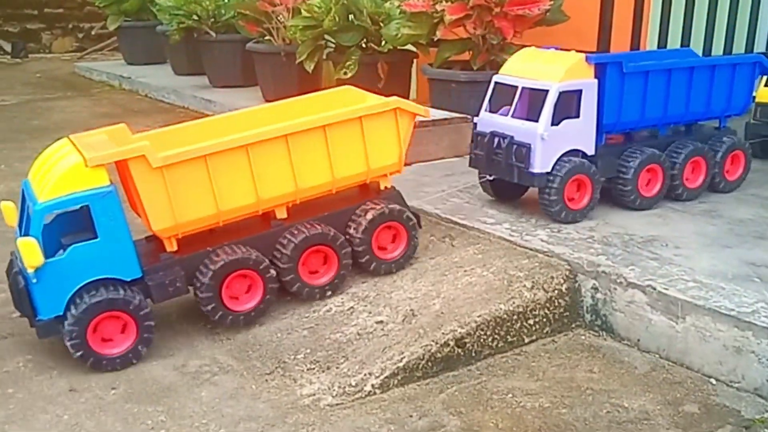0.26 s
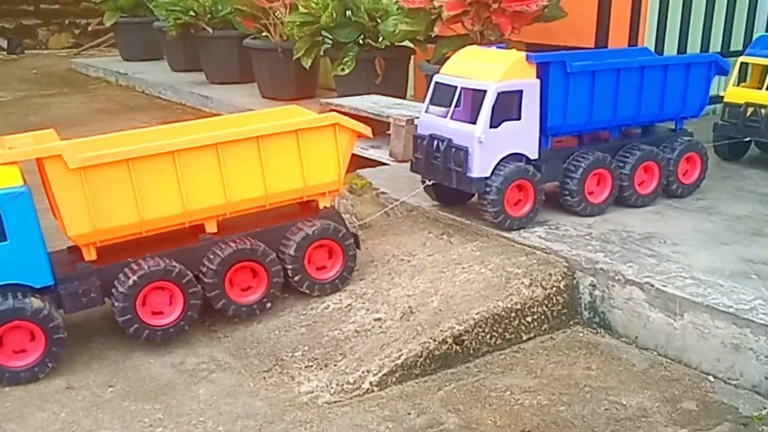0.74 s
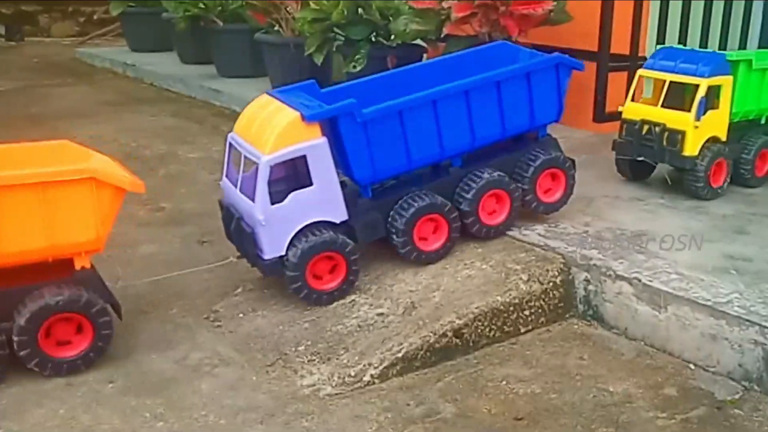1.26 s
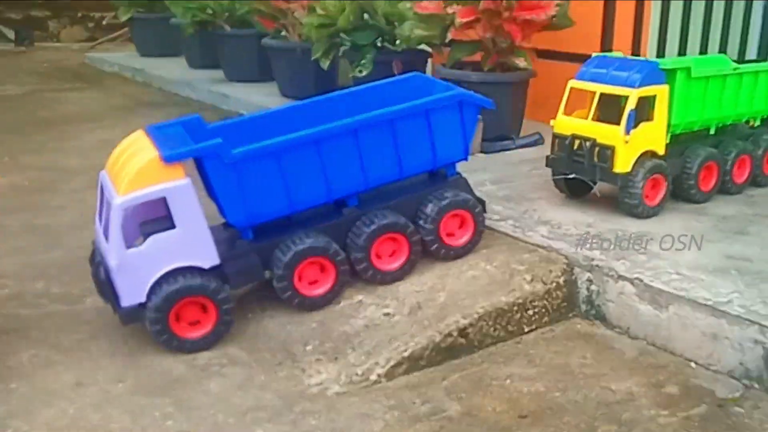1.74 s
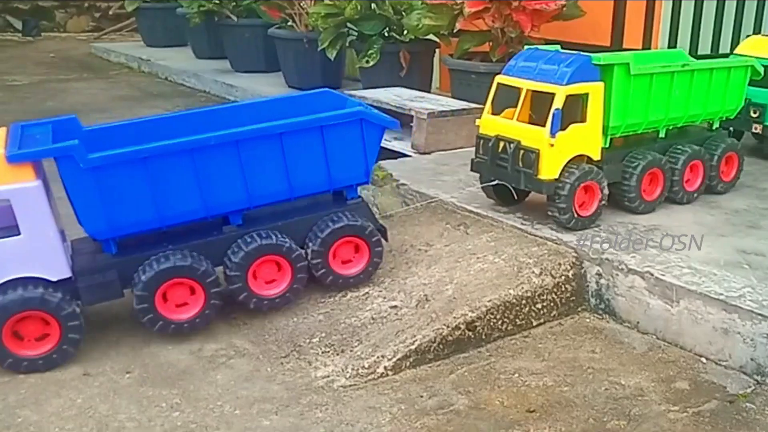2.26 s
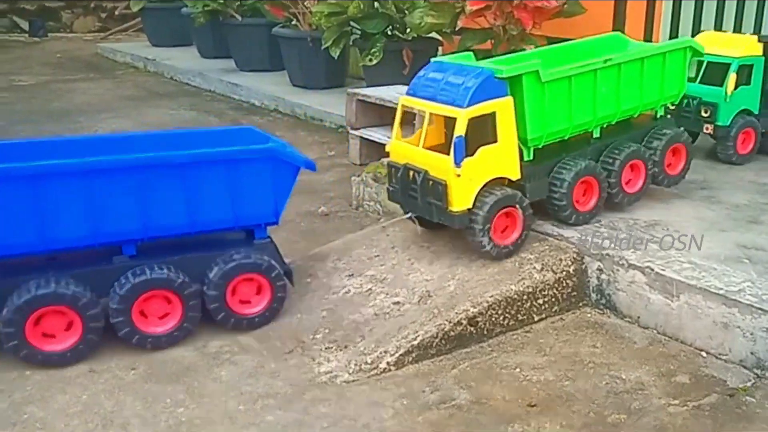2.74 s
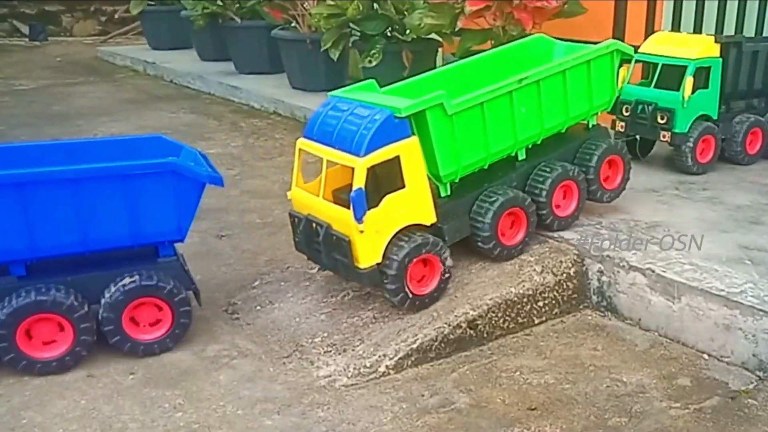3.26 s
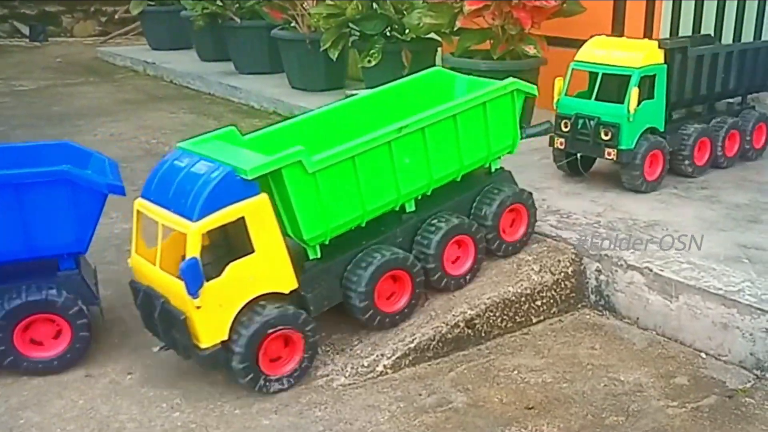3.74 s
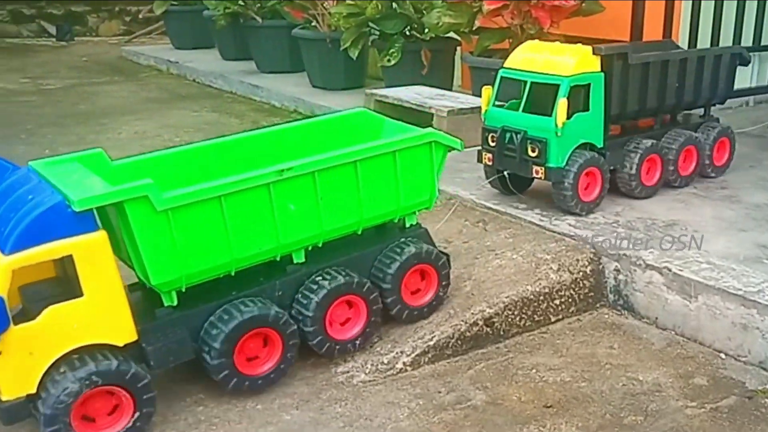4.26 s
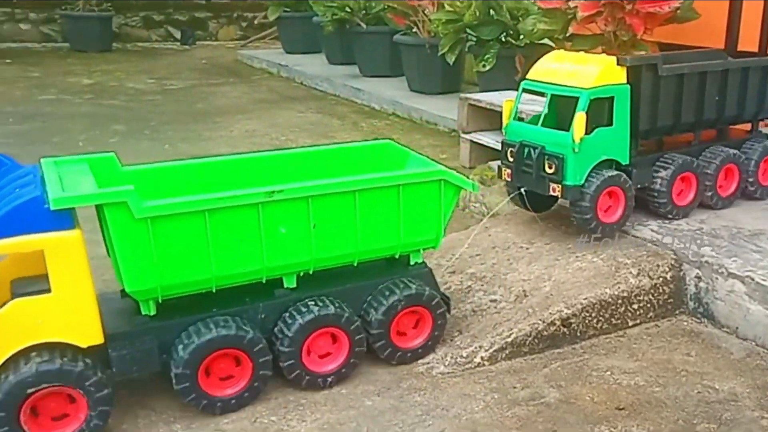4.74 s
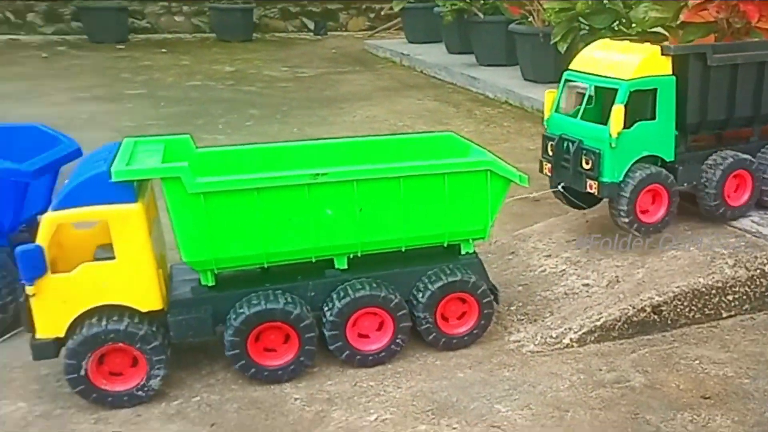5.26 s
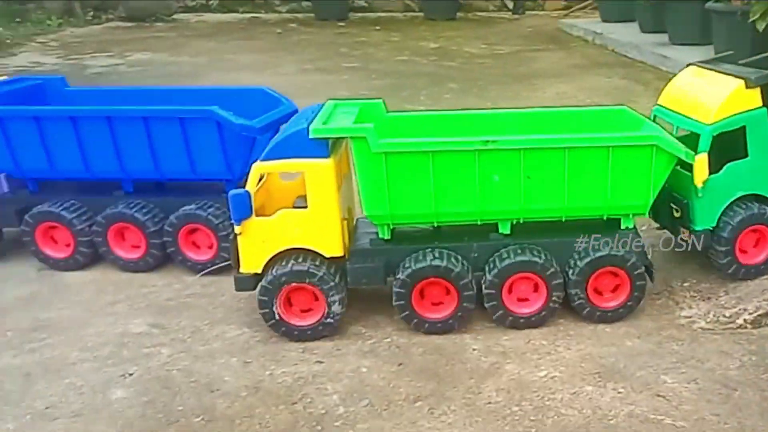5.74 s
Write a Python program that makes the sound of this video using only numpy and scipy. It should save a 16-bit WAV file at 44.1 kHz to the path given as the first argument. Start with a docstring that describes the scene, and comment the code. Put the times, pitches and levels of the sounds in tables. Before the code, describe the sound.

Continuous uneven clatter of hollow plastic toy dump trucks dragged across gritty concrete outdoors, with dull knocks, sharp clicks and short rattling wash.

```python
"""A yard of rough concrete, outdoors: a low steady rumble lies underneath, with a faint hiss.
Close by, hollow plastic toy trucks are pulled past. Tread lugs and loose axles knock the shells,
and grit under the wheels shakes them in a dense rattle. Each contact rings decaying sine modes
of one truck and opens a dying wash of filtered noise, in six registers."""
import sys
import numpy as np
from scipy import signal
from scipy.fft import rfft, irfft
from scipy.io import wavfile
from scipy.ndimage import uniform_filter1d, minimum_filter1d

SR = 44100
rng = np.random.default_rng(int(sys.argv[2]) if len(sys.argv) > 2 else 0)


def output_pcm(signal):
    """Save a mono or channel-first signal as 16-bit PCM at the path in sys.argv[1].

    Samples are clipped to [-1, 1] before scaling.
    """
    pcm = np.clip(np.atleast_2d(signal).T, -1, 1) * 32767
    wavfile.write(sys.argv[1], SR, np.round(pcm).astype(np.int16))


N = 264600  # samples, 6 s

# spectrum of the yard's background: (frequency [Hz], relative density [dB per Hz])
YARD_SPECTRUM = [(25, -36.5), (60, -19.5), (96, -5), (125, -4.5), (400, -9.5), (1000, -23), (3400, -22.5),
                 (5500, -44.5), (7500, -51), (9500, -56), (15500, -72.5)]
# rumble of the shells as they roll: (time [s], relative level [dB])
ROLL_LEVEL = [(0.0, -14), (0.15, -24), (0.42, -25.5), (0.8, -36.5), (0.95, -36), (1.19, -42), (1.23, -25.5),
              (1.38, -21), (1.79, -22.5), (1.94, -18.5), (2.89, -27), (3.19, -22.5), (3.59, -21.5),
              (3.79, -17.5), (4.03, -23), (4.6, -26), (5.31, -26.5), (5.53, -34.5), (5.71, -21),
              (6.0, -25.5)]
# light ticks of small loose parts, mostly treble: (time [s], click level [dB])
LOOSE_TICKS = [(1.0254, -32.5), (1.1967, -20), (2.2684, -25.5), (2.385, -19.5), (2.8714, -28),
               (3.026, -24.5), (4.254, -19.5), (5.025, -16), (5.1133, -23), (5.6026, -23.5), (5.653, -18.5)]
# knocks of lugs and axles on the shells:
# (time [s], thud level [dB], hardness as click re thud [dB], pitch of the struck panel [Hz])
KNOCKS = [(0.01, -11.5, -8, 603), (0.103, -10.5, -17, 681), (0.143, -10.5, -2.5, 799),
          (0.189, -14, -16.5, 595), (0.27, -6, -21, 807), (0.297, -9, -10, 633), (0.432, -10, -15, 546),
          (0.483, -11, -16, 482), (0.543, -17.5, -23, 727), (0.605, -9.5, -15, 649),
          (0.672, -17.5, -9, 665), (0.685, -15.5, -18, 764), (0.728, -13.5, -20, 673),
          (0.765, -10.5, -14, 624), (0.867, -14.5, -14.5, 627), (0.912, -10.5, -19.5, 511),
          (1.111, -22, -18, 689), (1.207, -13.5, -10, 487), (1.239, -7, -16, 466), (1.317, -12, -16.5, 503),
          (1.339, -7.5, -21, 525), (1.372, -13, -15, 614), (1.38, -9.5, -2.5, 665), (1.46, -8, -19, 476),
          (1.475, -2, -12.5, 428), (1.583, -9, -17, 471), (1.705, -9, -15, 482), (1.776, -15, -11.5, 778),
          (1.818, -6.5, -11.5, 450), (1.852, -1, -9.5, 659), (1.926, -5, -11.5, 522), (1.955, -7, -10, 420),
          (2.062, -9, -9.5, 514), (2.09, -7, -15, 493), (2.187, -8, -14.5, 479), (2.227, -14, -14, 794),
          (2.302, -10, -16, 471), (2.348, -14.5, -13, 756), (2.445, -6.5, -15, 514),
          (2.582, -6.5, -11, 471), (2.717, -12, -11.5, 479), (2.9, -10, -12.5, 466),
          (2.938, -14.5, -16, 530), (2.972, -9.5, -14, 493), (3.129, -9.5, -5, 522), (3.182, -11, -10, 458),
          (3.223, -6.5, -13, 563), (3.281, -8.5, -9.5, 638), (3.323, -10.5, -11, 468),
          (3.371, -7.5, -15.5, 493), (3.393, -9, -14.5, 487), (3.443, -9, -21, 463), (3.508, -6, -17, 482),
          (3.53, -7.5, -17.5, 576), (3.605, -7, -14, 436), (3.756, -10.5, -9, 506),
          (3.813, -4.5, -13.5, 665), (3.834, -7.5, -2.5, 684), (3.97, -9, -14.5, 482),
          (4.079, -12.5, -14, 603), (4.189, -7.5, -7, 899), (4.283, -10, -14, 611), (4.305, -8, -7.5, 525),
          (4.395, -11.5, -12, 646), (4.417, -7, -13, 428), (4.558, -10, -12, 490), (4.615, -8.5, -12, 541),
          (4.698, -10.5, -16.5, 530), (4.774, -15, -13, 519), (4.859, -6, -15.5, 530),
          (5.001, -9.5, -11.5, 495), (5.064, -12, -12, 501), (5.16, -12.5, -14, 525),
          (5.268, -6.5, -15, 431), (5.395, -19.5, -15.5, 633), (5.47, -8, -15.5, 646),
          (5.544, -6, -16, 530), (5.64, -14.5, -12, 732), (5.7, -13, -14, 840), (5.757, -10, -1, 759),
          (5.872, -11.5, -15, 608), (5.908, -9.5, -14.5, 522)]
# what a knock gives clack, click and tick: (level re thud [dB], share of hardness [dB per dB])
HARDNESS = [(0.5, 0.5042), (6, 1.0), (-13.5, 1.5)]
# registers of the plastic, boom, thud, clack, click, tick, snap: (low edge [Hz], high edge [Hz])
REGISTER_EDGES = [(170, 340), (330, 1020), (980, 2450), (2250, 4950), (5350, 8600), (8500, 19000)]
# how each register answers: (wash t60 [s], ring share [dB], grit re roll [dB])
REGISTER_ANSWERS = [(0.091, 0, -12.5), (0.2, -0.5, -1.6), (0.18, -2, -5), (0.13, -1.5, -3),
                    (0.11, -10, -25), (0.13, -30, -55)]
# strongest modes of shell and tipper bed, before each truck's tuning:
# (frequency [Hz], relative level [dB], t60 [s])
SHELL_MODES = [(387, -23.5, 0.074), (414, -21.5, 0.061), (476, -1.5, 0.061), (530, -6.5, 0.1),
               (614, -22.5, 0.053), (626, -3.5, 0.074), (738, -17.5, 0.31), (759, -4.5, 0.081),
               (864, -6, 0.036), (892, -0.5, 0.027), (1126, 7.5, 0.071), (1404, -48.5, 0.021),
               (1535, 2, 0.051), (1874, 3, 0.086), (1940, -8.5, 0.023), (2024, 1, 0.053),
               (2760, -2.5, 0.043), (2790, -6, 0.048), (3194, 3.5, 0.06), (3450, -4.5, 0.059),
               (3740, -5.5, 0.051), (4190, -4.5, 0.018), (4530, -36.5, .04), (6650, -7, .012)]
# wash of dense small modes: (frequency [Hz], relative density [dB per Hz])
WASH_SPECTRUM = [(150, -27.5), (340, -5.5), (484, -3.5), (900, -5), (1010, -5.5), (1890, -9), (2340, -16),
                 (3220, -14), (4500, -25), (5600, -42.5), (6700, -42.5), (8000, -52.5), (9500, -64.5),
                 (16000, -67.5)]
# no two mouldings ring quite alike: one factor on mode frequency [ratio] per truck
TRUCK_TUNING = (.975, 1.0, 1.03)

YARD_DB = -38.5  # rms of the background
# crunch of grit at the mean rumble, and its dB per dB of rumble
CRUNCH_DB, CRUNCH_SLOPE, ROLL_MEAN_DB = -34, 1.15, -23.5
GRAINS = 1800
GRIT_DB, GRIT_SPREAD_DB, GRIT_COLOUR_DB = -8.5, 3.5, 7  # base, size spread, spread per register
SMOOTH_DB = -3  # smooth rub re grit
TICK_LOW_DB, TICK_HIGH_DB = -9, -15.5  # re click: in the registers below, in tick
BOOM_DB = -11.5  # re thud: the whole shell flexes a little
SNAP_DB, SNAP_KNEE_DB, SNAP_SLOPE = -22, -47, 1.4  # hard contacts favour the top register
PANEL_BOOST_DB, PANEL_OCTAVES = 10, 0.11  # modes near the struck panel's pitch ring louder
BLOW_SPREAD_DB = 3.46  # where the blow lands
RING_DB, GRAIN_RING_DB = -14, -3.5  # a grain's light touch stirs the modes less than a knock
TAIL_DB, CRACK_DB, GRIT_WASH_DB = -11.5, -7, -9.5
CRACK_SHORTER, GRIT_SHORTER = 0.3, 0.3  # share of the register's t60
CHATTER_DB, CHATTER_S = 3, 0.0025  # depth and correlation time of the lumps
LIMIT, CUTOFF_HZ = 0.92, 16000


def from_db(db):
    """Decibels to amplitude gain."""
    return 10 ** (np.asarray(db) / 20)


def rms_one(x):
    """Scale to rms 1."""
    return x / np.sqrt(np.mean(x ** 2) + 1e-20)


def coloured(points):
    """Noise with a spectrum interpolated on a log-frequency axis."""
    hz, level_db = np.transpose(points)
    grid = np.maximum(np.arange(N // 2 + 1) * SR / N, 1)
    gain = from_db(np.interp(np.log(grid), np.log(hz), level_db))
    return irfft(rfft(rng.standard_normal(N)) * gain, N)


def yard():
    """Steady far rumble and hiss: coloured noise at a constant level."""
    return from_db(YARD_DB) * rms_one(coloured(YARD_SPECTRUM))


def rolling():
    """Rolling level over time in each register [dB]: the crunch of grit follows the rumble."""
    rumble_db = np.interp(np.arange(N) / SR, *np.transpose(ROLL_LEVEL))
    crunch_db = CRUNCH_DB + CRUNCH_SLOPE * (rumble_db - ROLL_MEAN_DB)
    between_db = (rumble_db + crunch_db) / 2
    roll_db = np.array([rumble_db, rumble_db, between_db, crunch_db, crunch_db, crunch_db])
    return roll_db + np.array(REGISTER_ANSWERS)[:, -1:]


def grit(roll_db):
    """Grains at random moments, of uneven size and colour, as strong as the rolling."""
    at = rng.integers(0, N, GRAINS)
    size_db = GRIT_DB + GRIT_SPREAD_DB * np.minimum(rng.exponential(1, GRAINS), 2.5)
    colour_db = GRIT_COLOUR_DB * rng.standard_normal((len(REGISTER_ANSWERS), GRAINS))
    return at, rng.uniform(380, 903, GRAINS), roll_db[:, at] + size_db + colour_db


def add_snap(levels_db):
    """The snap register grows faster than the tick register below it."""
    snap_db = SNAP_KNEE_DB + SNAP_DB + SNAP_SLOPE * (levels_db[-1] - SNAP_KNEE_DB)
    return np.array([*levels_db, snap_db])


def loose_ticks():
    """Small loose parts touch lightly: strongest in click, weaker below and above."""
    s, click_db = np.transpose(LOOSE_TICKS)
    low_db = click_db + TICK_LOW_DB
    levels_db = [low_db + BOOM_DB, low_db, low_db, click_db, click_db + TICK_HIGH_DB]
    at = np.round(s * SR).astype(int)
    return at, rng.uniform(380, 900, len(s)), add_snap(levels_db)


def knocks():
    """Lugs and axles strike panels: a harder contact puts more into the higher registers."""
    s, thud_db, hard_db, panel_hz = np.transpose(KNOCKS)
    higher_db = [thud_db + rel_db + share * hard_db for rel_db, share in HARDNESS]
    levels_db = add_snap([thud_db + BOOM_DB, thud_db, *higher_db])
    return np.round(s * SR).astype(int), panel_hz, levels_db


def ring(clicks, hz, t60):
    """Two-pole resonator: a unit click starts a decaying sine of height about 1."""
    r, w = from_db(-60 / (t60 * SR)), 2 * np.pi * hz / SR
    # the tiny offset keeps the filter from slowing down on near-zero numbers
    return signal.lfilter([0, np.sin(w)], [1, -2 * r * np.cos(w), r * r], clicks + 1e-18)


def fade(power, t60, rise_s):
    """Envelope of contacts that build up briefly and die away; their powers add."""
    r, q = from_db(-120 / (t60 * SR)), np.exp(-1 / (rise_s * SR))  # 120: decay of power
    poles = np.convolve([1, -r], [1, -q])
    return np.sqrt(signal.lfilter([1 - q], poles, power + 1e-18))


def chatter():
    """Loose parts break the treble into short lumps: low-passed noise [rms 1]."""
    pole = np.exp(-1 / (CHATTER_S * SR))
    return rms_one(signal.lfilter([1], [1, -pole], rng.standard_normal(N)))


def small_modes(noise, lumps, low_hz, t60, at, is_knock, strength, rub):
    """Wash of dense modes: knocks crack and leave a tail, grains die sooner, rub follows the roll."""
    knock_power = np.bincount(at, is_knock * strength ** 2, N)
    grain_power = np.bincount(at, ~is_knock * strength ** 2, N)
    tail = from_db(TAIL_DB) * fade(knock_power, t60, rise_s=0.0027)
    crack = from_db(CRACK_DB) * fade(knock_power, t60 * CRACK_SHORTER, rise_s=0.00029)
    grains = from_db(GRIT_WASH_DB) * fade(grain_power, t60 * GRIT_SHORTER, rise_s=0.00026)
    shaken = from_db(2 * CHATTER_DB * lumps * min(low_hz / 2500, 1))  # power gain, weak in the bass
    return noise * np.sqrt(shaken * (tail ** 2 + rub ** 2) + crack ** 2 + grains ** 2)


def strong_mode(mode, ring_db, at, panel_hz, is_knock, strength, truck):
    """One shell mode, tuned for each truck and struck unevenly by that truck's contacts."""
    hz, level_db, t60 = mode
    near_db = PANEL_BOOST_DB * np.exp(-(np.log2(hz / panel_hz) / PANEL_OCTAVES) ** 2)
    blow_db = near_db + GRAIN_RING_DB * ~is_knock + BLOW_SPREAD_DB * rng.standard_normal(len(at))
    struck = strength * from_db(blow_db)
    out = np.zeros(N)
    for k, tuning in enumerate(TRUCK_TUNING):
        blows = np.bincount(at, struck * (truck == k), N)
        out += from_db(level_db + ring_db + RING_DB) * ring(blows, hz * tuning, t60)
    return out


def trucks():
    """Each contact falls to a random truck and sounds its strong modes and the small-mode wash."""
    roll_db = rolling()
    sources = [knocks(), loose_ticks(), grit(roll_db)]
    at, panel_hz, levels_db = (np.concatenate(parts, axis=-1) for parts in zip(*sources))
    strengths, rubs = from_db(levels_db), from_db(roll_db + SMOOTH_DB)
    truck = rng.integers(0, len(TRUCK_TUNING), len(at))
    is_knock = np.arange(len(at)) < len(KNOCKS) + len(LOOSE_TICKS)  # ticks sound as light knocks
    lumps, wash, out = chatter(), coloured(WASH_SPECTRUM), np.zeros(N)
    registers = zip(REGISTER_EDGES, REGISTER_ANSWERS, strengths, rubs)
    for (low_hz, high_hz), (t60, ring_db, _), strength, rub in registers:
        band = signal.butter(5, [low_hz, high_hz], "band", fs=SR, output="sos")
        noise = rms_one(signal.sosfilt(band, wash))
        part = small_modes(noise, lumps, low_hz, t60, at, is_knock, strength, rub)
        for mode in SHELL_MODES:
            if 0.96 * low_hz <= mode[0] < 0.96 * high_hz:
                part += strong_mode(mode, ring_db, at, panel_hz, is_knock, strength, truck)
        # band-pass again, so sharp envelopes do not spill into other registers
        out += signal.sosfilt(band, part)
    return out


def scene():
    """Trucks close by over the yard's background, one channel."""
    return (yard() + trucks())[None]


def record(dry):
    """Finish: a fast limiter holds the peaks, then a steep low-pass near 16 kHz cuts the top."""
    gain = minimum_filter1d(LIMIT / np.maximum(np.abs(dry), LIMIT), size=301)
    smooth_gain = uniform_filter1d(uniform_filter1d(gain, size=151), size=151)
    low_pass = signal.cheby2(16, 50, CUTOFF_HZ, fs=SR, output="sos")  # 50 dB down at the cutoff
    return signal.sosfilt(low_pass, dry * smooth_gain)


dry = scene()
out = record(dry)
output_pcm(out)
```